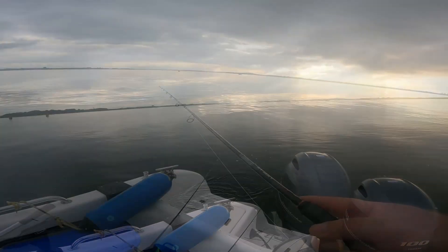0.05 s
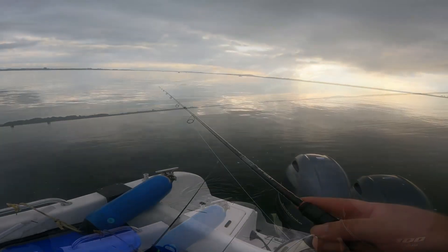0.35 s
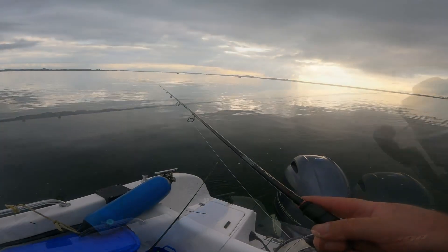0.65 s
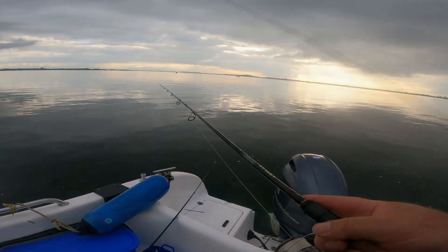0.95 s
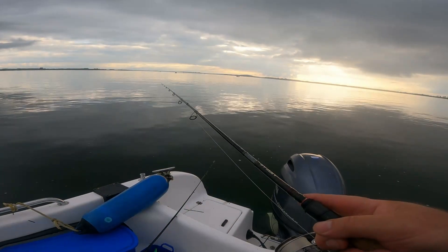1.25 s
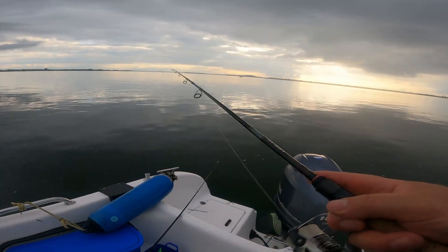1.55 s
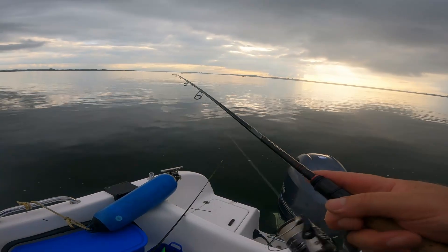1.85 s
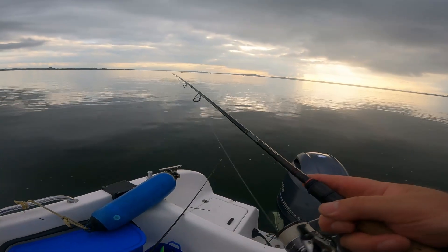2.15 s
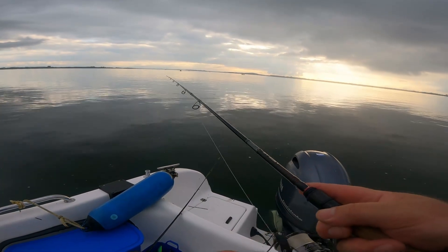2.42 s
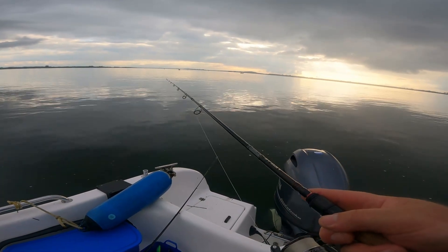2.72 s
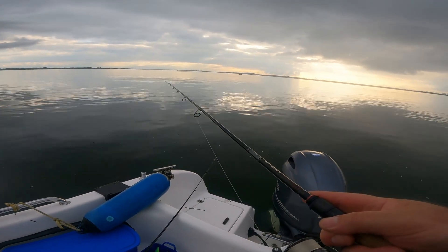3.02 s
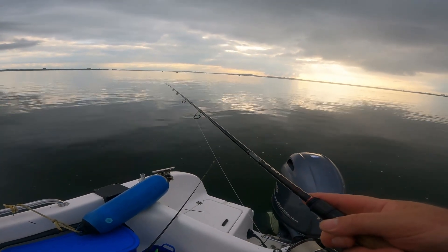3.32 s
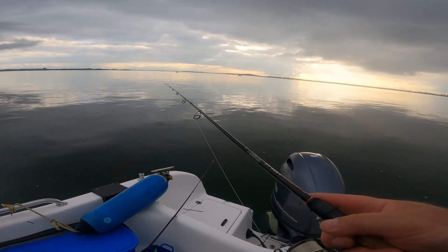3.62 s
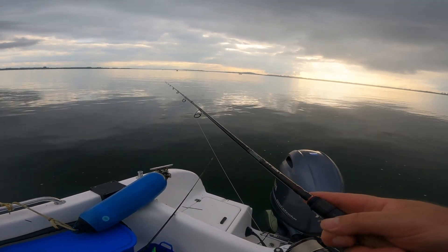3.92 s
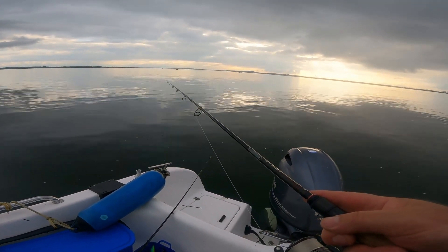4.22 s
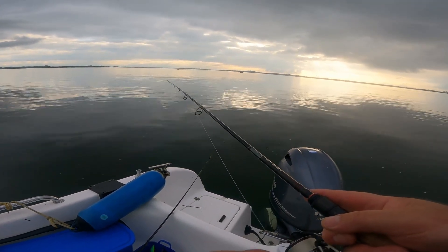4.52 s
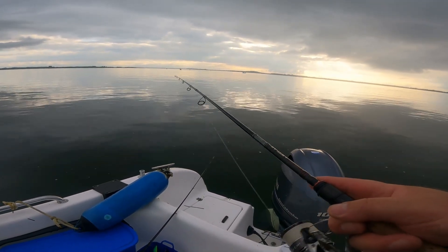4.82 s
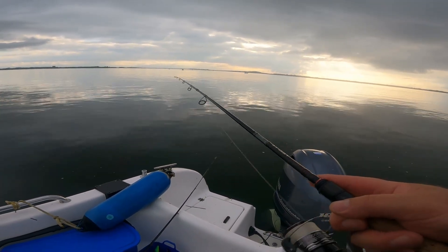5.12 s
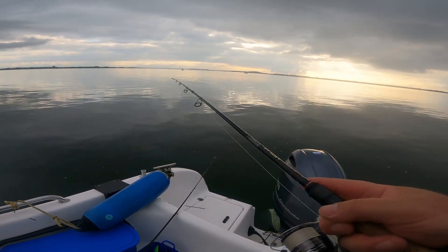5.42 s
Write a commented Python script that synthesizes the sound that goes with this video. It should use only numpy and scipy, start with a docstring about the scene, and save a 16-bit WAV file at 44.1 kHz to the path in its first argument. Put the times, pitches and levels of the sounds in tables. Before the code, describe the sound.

A low engine hum swells and sinks throughout, along with soft wind rumble on the microphone, a gentle wash of water around the boat and a very faint high whistle. For the first second, fishing tackle ticks and clinks close by, sharpest at about 0.6 and 0.8 seconds, with a light rustle of clothing. From about 1.5 to 2.5 seconds a spinning reel is cranked, its fine gear whirr rising and falling with each turn while a sleeve brushes a jacket three times. A click follows at 2.6 seconds, then faint ticks and rustles as the hand shifts on the rod. Two small clicks come around 4.6 seconds, and the reel whirs again from 4.7 seconds to the end at about 5.5 seconds, with sleeve brushes near 4.9 and 5.3 seconds. Everything is fairly quiet and in the open air.

```python
"""A spinning reel is cranked in two short spells on a boat lying on calm open water.
Gear contacts ring the reel body, whirring up and down once per turn of the handle, and a sleeve
brushes the jacket. Between spells the tackle ticks and the hand shifts its grip on the rod.
Under it all: a low engine hum, soft wind rumble, the wash of the water and a very faint high whistle."""
import sys
import numpy as np
from scipy import signal
from scipy.io import wavfile

SR = 44100
rng = np.random.default_rng(int(sys.argv[2]) if len(sys.argv) > 2 else 0)


def pcm_store(signal):
    """Save signal as 16-bit PCM."""
    levels = np.round(np.clip(np.atleast_2d(signal), -1, 1) * 32767)
    wavfile.write(sys.argv[1], SR, levels.astype(np.int16).T)


N = 241260
T = np.arange(N) / SR

# Spells of cranking. Each row: start, stop in seconds.
SPELLS = [(1.49, 2.5), (4.685, 5.6)]
# Sleeve strokes: a firm brush each turn, a lighter slide on reaching or letting go. Each row: centre and
# half length in seconds, shape exponent, body and hiss in dB, pitch of the hollow under the arm in Hz.
STROKES = [(1.431, 0.091, 1.7, -45.5, -54.5, 649), (1.693, .05, 1.53, -34.5, -40.5, 775),
           (2.037, 0.053, 1.5, -37, -43, 655), (2.393, 0.057, 1.8, -37.5, -43.5, 504),
           (2.54, 0.049, 2.0, -58, -69, 520), (2.6, 0.059, 2.5, -52.5, -61, 520),
           (4.707, 0.11, 3.17, -47, -56.5, 600), (4.928, .06, 1.8, -36.5, -40.5, 635),
           (5.3, 0.068, 2, -38, -43, 633.4)]
# Broad resonances of scuffed tackle. Each row: centre in Hz, width in Hz, gain in dB.
SCUFF_MODES = [(2550, 320, -17), (4400, 2100, -9.5), (5700, 3100, -7.5), (7200, 420, 2.5),
               (9260, 1800, -13), (12000, 2100, -15)]
# Narrow modes of a metal fitting. Each row: centre in Hz, width in Hz, gain in dB.
CLINK_MODES = [(2660, 73, -5.5), (6000, 47, 3), (6300, 70, -6), (7610, 81, -0.5), (9950, 69, 4),
               (13900, 90, -2), (15800, 250, -12)]


def from_db(db):
    """Decibels to gain."""
    return np.exp(np.asarray(db) * np.log(10) / 20)


def unit_rms(x):
    """Scale to unit power."""
    return x / np.sqrt(np.mean(x ** 2) + 1e-20)


def in_time(rows):
    """Interpolate rows of (seconds, values..) to every sample; one curve per value column."""
    times_s, *columns = np.transpose(rows)
    return [np.interp(T, times_s, column) for column in columns]


def at_hz(points, hz):
    """Read (Hz, value) points on a log-frequency axis."""
    points_hz, values = np.transpose(points)
    return np.interp(np.log(hz), np.log(points_hz), values)


def drift(rate_hz):
    """Smooth random wander of unit RMS."""
    hop, settle = 40, 2000
    pole = np.exp(-2 * np.pi * rate_hz * hop / SR)
    white = rng.standard_normal(N // hop + settle + 2)
    slow = signal.lfilter([1], [1, -2 * pole, pole ** 2], white)[settle:]
    return np.interp(np.arange(N) / hop, np.arange(len(slow)), unit_rms(slow))


def resonate(x, hz, width_hz):
    """Two-pole resonance, unity peak gain."""
    radius = np.exp(-np.pi * width_hz / SR)
    feedback = [1, -2 * radius * np.cos(2 * np.pi * hz / SR), radius ** 2]
    return signal.lfilter(np.array([1, 0, -1]) * (1 - radius ** 2) / 2, feedback, x + 1e-18)


def steep(x, hz, width_hz):
    """Two equal resonances in series, for steep skirts."""
    return resonate(resonate(x, hz, width_hz), hz, width_hz)


def ring_modes(x, modes, polarity=1):
    """Parallel resonances from rows of (Hz, width Hz, dB); polarity -1 alternates their signs."""
    return sum(polarity ** k * from_db(db) * resonate(x, hz, width_hz)
               for k, (hz, width_hz, db) in enumerate(modes))


def pan(left_db):
    """Stereo gains, left over right by left_db."""
    return from_db(np.array([[1], [-1]]) * left_db / 2)


def swell(centre_s, half_s, shape):
    """Envelope of one movement, peak 1; shape 1 is pointed, 2 round, higher flat-topped."""
    return np.exp(-np.minimum(np.abs((T - centre_s) / half_s) ** shape, 20))


def cranking(start_s, stop_s, ramp_s=0.05):
    """1 while the handle turns, 0 at rest, ramped at each end."""
    return np.clip(np.minimum(T - start_s, stop_s - T) / ramp_s + .5, 0, 1)


def tone(hz, waver_hz, waver_db):
    """Slightly unsteady sine of unit power."""
    cycles = np.cumsum(hz + waver_hz * drift(3.32)) / SR + rng.random()
    return unit_rms(np.sin(2 * np.pi * cycles) * from_db(waver_db * drift(2.74)))


def noise_bands(colour, balance, likeness, flicker_db, flicker_hz):
    """Flickering stereo noise in quarter octaves, total power 1, as a list of (Hz, band)."""
    edges_hz = 7900 * 2 ** (np.arange(-36, 5) / 4)
    edges_hz = edges_hz[(edges_hz > colour[0][0] / 1.1) & (edges_hz < colour[-1][0] * 1.2)]
    white = rng.standard_normal((2, 2, N))
    bands = []
    for k, (low_hz, high_hz) in enumerate(zip(edges_hz, edges_hz[1:])):
        bandpass = signal.butter(3, [low_hz, high_hz], "band", fs=SR, output="sos")
        mid, side = signal.sosfilt(bandpass, white[k % 2])
        hz = np.sqrt(low_hz * high_hz)
        alike = np.clip(at_hz(likeness, hz), -.9, .999)
        stereo = np.sqrt(1 + alike) * mid + np.sqrt(1 - alike) * side * np.array([[0.9], [-1.33]])
        gain = from_db(at_hz(colour, hz) + flicker_db * drift(flicker_hz))
        bands.append((hz, stereo * gain * pan(at_hz(balance, hz))))
    total_rms = np.sqrt(sum(np.mean(band ** 2) for hz, band in bands))
    return [(hz, band / total_rms) for hz, band in bands]


def diffuse_noise(colour, flicker_db, flicker_hz):
    """Coloured open-air noise of unit power."""
    # Each row: frequency in Hz, leftward bias in dB.
    balance = [(60, 0.55), (92, 0.5), (140, 1.0), (210, 1.6), (330, 3), (500, 6.5), (770, 10), (1170, 7.4),
               (1790, 6.0), (2740, 14), (4190, 3.7), (6410, 4.3), (9810, 3.7), (15000, 1.3)]
    # Each row: frequency in Hz, left-right likeness (1 = alike).
    likeness = [(25, .99), (50, 0.99), (300, 0.99), (600, 0.9), (850, 0.36), (1400, 0.87), (2000, 0.1),
                (2450, 0.35), (2900, 0.1), (3700, 0.72), (6000, 0.43), (12000, 0.12)]
    return sum(band for hz, band in noise_bands(colour, balance, likeness, flicker_db, flicker_hz))


def whistle(hz=5370, width_hz=330, level_db=-82, waver_db=3.0):
    """Very faint, airy whistle: narrow-band noise that comes and goes."""
    gain = from_db(level_db + waver_db * drift(4.0))
    return gain * unit_rms(steep(rng.standard_normal(N), hz, width_hz)) * pan(left_db=1.0)


def wind_and_water(wind_trim_db=3.5, wash_db=-47.5, wash_follows=0.6):
    """Wind rumbles on the microphone; water washes round the hull, a little more in the gusts."""
    # Each row: time in seconds, rumble level in dB.
    gusts = [(0.0, -50), (0.7, -46.5), (1.1, -43.5), (1.75, -42.5), (2.6, -46), (3.05, -41), (3.6, -45.5),
             (4.9, -43.5), (5.47, -43.5)]
    # Spectra. Each row: frequency in Hz, relative density in dB.
    wind_colour = [(12, -30), (20, 0), (34, 2), (54, 8), (100, 2), (140, 1.5), (236, -7.5), (285, -2),
                   (348, -10.5), (400, -18), (520, -52), (880, -120)]
    wash_colour = [(150, 3.5), (300, -2), (450, 0.5), (620, -4), (850, -15), (1150, -8.5), (1500, -16),
                   (1950, -18.5), (2500, -19.5), (3200, -28), (3900, -37.5), (5400, -30), (7500, -38.5),
                   (9000, -53), (12500, -67)]
    gust_db, = in_time(gusts)
    wind = diffuse_noise(wind_colour, flicker_db=1.5, flicker_hz=18)
    wash = diffuse_noise(wash_colour, flicker_db=1.37, flicker_hz=7.8)
    surge_db = wash_follows * (gust_db - gust_db.mean())
    return wind * from_db(gust_db + wind_trim_db) + wash * from_db(wash_db + surge_db)


def engine_hum(throb_hz=50.6, low_line_hz=144.5, high_line_hz=207.8):
    """Engine drone: a deep throb that swells and sinks, a higher note, weak wavering lines between."""
    # Throb and two lines that come and go. Each row: time in seconds, level in dB.
    throb_curve = [(0.0, -35.5), (0.15, -37.5), (0.45, -47), (1.15, -45), (1.3, -35), (1.7, -28),
                   (2.1, -32.5), (2.3, -40), (2.75, -30), (3.18, -30.0), (3.33, -39.5), (3.55, -63),
                   (3.85, -40.5), (4.45, -31.5), (4.9, -35), (5.07, -53), (5.35, -33.5), (5.47, -29.5)]
    low_line_curve = [(0.0, -49.5), (0.8, -45.5), (1.6, -45.5), (2.05, -58.5), (2.4, -45), (3.3, -57.5),
                      (4.4, -46), (5.47, -56.5)]
    high_line_curve = [(0.0, -64.5), (1.3, -54), (1.9, -67), (2.55, -48), (3.25, -57), (3.48, -44),
                       (3.68, -59.5), (5.47, -53.5)]
    # Each row: time in seconds, pitch in Hz, level in dB.
    note_curve = [(0.0, 288.0, -48), (0.52, 286.8, -49.5), (0.55, 279.2, -64), (0.7, 287.5, -47),
                  (1.95, 287.2, -42), (1.98, 288, -54), (2.06, 285, -46.5), (2.12, 286.8, -72),
                  (2.15, 287.7, -49), (2.45, 287.5, -44), (3.53, 287.2, -46.5), (3.66, 290.6, -36),
                  (3.72, 285.6, -44), (4.63, 289, -43.5), (5.18, 287.8, -47), (5.41, 288.3, -40),
                  (5.44, 287, -53), (5.47, 280, -38)]
    # Each row: frequency in Hz, level in dB.
    steady_lines = [(101, -53.5), (126.7, -52), (177, -56), (269, -57.5)]
    throb_db, = in_time(throb_curve)
    low_db, = in_time(low_line_curve)
    high_db, = in_time(high_line_curve)
    note_hz, note_db = in_time(note_curve)
    throb = from_db(throb_db - 0.24) * tone(throb_hz, waver_hz=0.65, waver_db=-0.5)
    note = from_db(note_db - 0.4) * tone(note_hz, waver_hz=0.77, waver_db=1.2)
    lines = sum(from_db(db) * tone(hz, waver_hz=0.853, waver_db=1.5)
                for hz, db in [(low_line_hz, low_db), (high_line_hz, high_db + 1.0), *steady_lines])
    return throb * pan(left_db=0.7) + note * pan(left_db=1.5) + lines * pan(left_db=1.0)


def handling(rest_db=-92.5, busy_db=-63, max_catches_per_s=1100, spread_db=9.5,
             metal_db=-16, crackle_db=-3.0):
    """Clothes rustle faintly; the busier the hand, the more tiny catches it makes on the tackle."""
    # Each row: centre in seconds, half length in seconds, level in dB.
    grip_shifts = [(0.004, 0.13, -64.5), (0.604, 0.34, -68), (1.23, 0.033, -68), (2.69, 0.063, -74),
                   (2.908, 0.1, -73), (3.147, .13, -75), (3.455, 0.17, -74)]
    # Each row: frequency in Hz, relative density in dB.
    rustle_colour = [(1500, -17), (3000, 3), (4400, 4.5), (5600, 0.5), (6600, 1.5), (7500, -0.5),
                     (8800, -5), (12500, -13.5), (14500, -23)]
    motion = from_db(rest_db) + sum(from_db(db) * swell(centre_s, half_s, shape=0.83)
                                    for centre_s, half_s, db in grip_shifts)
    cloth = diffuse_noise(rustle_colour, flicker_db=3.5, flicker_hz=42) * from_db(2.4 * drift(120))
    busy = np.minimum(motion / from_db(busy_db), 1)
    caught = rng.random(N) < busy * max_catches_per_s / SR
    catches = caught * from_db(spread_db * np.clip(rng.standard_normal((2, N)), -2, 2))
    scuffs = ring_modes(catches, SCUFF_MODES, polarity=-1)
    clinks = from_db(metal_db) * ring_modes(catches, CLINK_MODES)
    crackle = unit_rms(np.diff(scuffs + clinks, prepend=0))  # small contacts are crisper than ticks
    return motion * (cloth + from_db(crackle_db) * busy * crackle * pan(left_db=7.5))


def tackle_ticks(clink_boost_db=17.0, tail_db=-32, tail_t60_s=0.2, stereo_spread=0.36):
    """Short scuffs of line and fittings; some set metal ringing, all leave a faint tail off the deck."""
    # Each row: start in seconds, level in dB, main resonance's centre and width in Hz,
    # its gain in dB, 60 dB decay time in seconds, relative clink in dB.
    ticks = [(0.043, -51, 5900, 400, -3, 0.02, -18), (0.132, -40, 2040, 300, 18, 0.035, -13),
             (0.139, -42, 5330, 500, 14, 0.015, -28), (0.174, -39, 5750, 120, 13, 0.053, -4),
             (0.2, -49, 7700, 400, 10, 0.046, -20), (0.228, -48, 5800, 400, 2, .012, -20),
             (0.2566, -44, 2560, 200, 23, .008, -19), (0.2625, -33, 5800, 200, 11, 0.016, -18),
             (0.427, -47.5, 1960, 200, 32, 0.059, -41), (0.477, -51, 7770, 400, 2, 0.053, -13),
             (0.5947, -28.5, 6050, 130, 25, 0.0065, -7), (0.721, -50, 7850, 300, 19, .01, -20),
             (0.7618, -25.5, 7300, 1500, -9, 0.0027, -23), (0.767, -39, 7800, 400, 1, .025, -24),
             (0.8, -48.5, 5400, 400, 3, 0.032, -7), (0.9547, -52, 4870, 400, 25, .012, -30),
             (0.9811, -36, 7160, 700, 17, .004, -13), (0.986, -36, 7900, 900, 12, 0.023, -22),
             (1.022, -57, 7900, 300, 15, .008, -22), (1.048, -57, 6000, 600, 0, .025, -18),
             (1.2994, -47, 6290, 600, 12, .006, -25), (2.567, -37.5, 4970, 1503, 15, 0.0061, -31),
             (2.873, -52, 3300, 500, 16, .006, -30), (2.913, -52, 5250, 400, 15, .008, -36),
             (2.928, -49, 3130, 400, 21, .008, -32), (3.455, -54, 4200, 900, 22, .012, -30),
             (3.7184, -56, 4200, 700, 16, .005, -26), (3.789, -59, 4300, 250, 22, .006, -32),
             (3.957, -63.5, 4100, 500, 17, .004, -33), (4.081, -51.5, 4200, 400, 16, 0.0054, -30),
             (4.449, -59, 6960, 600, 2, 0.0042, -25), (4.556, -40, 4240, 350, 10, 0.0093, -31),
             (4.592, -45, 6200, 900, 13, 0.013, -28)]
    out = np.zeros((2, N))
    t = T[:SR // 4]
    soften = signal.butter(2, [1700, 11500], "band", fs=SR, output="sos")
    for start_s, level_db, hz, width_hz, main_db, t60_s, clink_db in ticks:
        mid, side = rng.standard_normal((2, len(t)))
        envelope = from_db(-60 * t / t60_s) + from_db(tail_db - 60 * t / tail_t60_s)
        scuff = (mid + stereo_spread * side * np.array([[1], [-1]])) * envelope
        knock = ring_modes(scuff, [(hz, width_hz, main_db), *SCUFF_MODES])
        clink = from_db(clink_db + clink_boost_db) * ring_modes(scuff, CLINK_MODES)
        tick = signal.sosfilt(soften, knock) + clink
        peak = np.abs(tick.mean(axis=0)).max()
        start = int(start_s * SR)
        out[:, start:start + len(t)] += tick / peak * from_db(level_db)
    return out * pan(left_db=5.5)


def arm_hollow(level_db=-39.5, upper_hz=1040, upper_db=1.0, firm_db=-35, growth=1.6):
    """Two resonances of the hollow between arm and chest; the lower changes with the arm's place."""
    out = 0
    for centre_s, half_s, shape, body_db, _, lower_hz in STROKES:
        white = rng.standard_normal(N)
        lower = unit_rms(steep(white, lower_hz, width_hz=210))
        upper = unit_rms(steep(white, upper_hz, width_hz=380)) * from_db(upper_db)
        gain = from_db(level_db + growth * (body_db - firm_db))
        out = out + (lower + upper) * gain * swell(centre_s, half_s, shape)
    return out * pan(left_db=5.5)


def sleeve_levels(touch_body_db=-53, touch_hiss_db=-56.5):
    """Body and hiss curves in dB: a light touch while cranking, power-summed with the strokes."""
    moves = [(swell(centre_s, half_s, shape), (body_db, hiss_db))
             for centre_s, half_s, shape, body_db, hiss_db, _ in STROKES]
    moves += [(cranking(*spell), (touch_body_db, touch_hiss_db)) for spell in SPELLS]
    power = sum(np.outer(from_db(levels_db), envelope) ** 2 for envelope, levels_db in moves)
    return 10 * np.log10(power + 1e-18)


def sleeve(body_hz=1300, hiss_hz=6000, body_trim_db=3.0, hiss_trim_db=8.5, grain_db=1.37, grain_hz=220):
    """Cloth slides on cloth in tiny catches; a firm stroke also rings the hollow under the arm."""
    # Each row: frequency in Hz, relative density in dB.
    rub_colour = [(180, -15), (300, -9), (400, -6), (620, -9.5), (850, -6), (1150, -6), (1450, -5),
                  (3100, -7), (3600, -6.5), (4300, -7.5), (6040, -11.5), (7500, -12.5), (8400, -20),
                  (12100, -25), (14500, -53)]
    # Each row: frequency in Hz, leftward bias in dB.
    balance = [(60, 0.5), (110, 0.5), (200, 19), (380, 3.5), (700, -1), (1290, 2.5), (2380, 2.5),
               (4400, 1.5), (8120, 5), (15000, -1)]
    # Each row: frequency in Hz, left-right likeness (clipped just under 1 in use).
    likeness = [(280, 18), (550, 0.5), (1200, 1), (2500, 0.65), (4500, 0.96), (8000, 1), (13000, 0.5)]
    body_db, hiss_db = sleeve_levels()
    out = arm_hollow()
    for hz, band in noise_bands(rub_colour, balance, likeness, flicker_db=1.5, flicker_hz=32):
        hiss_share = at_hz([(body_hz, 0), (hiss_hz, 1)], hz)
        band_db = (1 - hiss_share) * (body_db + body_trim_db) + hiss_share * (hiss_db + hiss_trim_db)
        out = out + band * from_db(band_db)
    return out * from_db(grain_db * drift(grain_hz))


def reel(level_db=-49, contacts_per_tooth=6, tooth_depth=0.41, jitter=0.011, uneven_db=2.0,
         bite_db=2.4, grit=0.3, stereo_spread=0.35):
    """Gear contacts ring the reel body; their overtones glide through its modes with crank speed."""
    # One list per spell; the crank speeds up under load, coasts, and slows at each brush.
    # Each row: time in seconds, gear contacts per second, the hand's push in dB.
    crank = [
        [(1.488, 390, 13), (1.503, 450, 7), (1.521, 505, 5), (1.536, 487, -1.5), (1.568, 496, 7.5),
         (1.597, 522, -1), (1.612, 556, 1), (1.635, 573, 0), (1.7, 400, -15), (1.765, 400, -1), (1.79, 437, 2),
         (1.805, 466, -1), (1.818, 483, 9), (1.836, 511, -3), (1.856, 560, 0), (1.877, 562, -5), (1.9, 513, -3),
         (1.932, 480, -8), (1.955, 500, -1), (2.04, 390, -13), (2.1, 418, 2), (2.122, 447, -2),
         (2.146, 496, -1), (2.17, 479, 0), (2.205, 514, -12), (2.237, 482, -2), (2.263, 478, -9),
         (2.298, 455, 4.5), (2.33, 447, -5.5), (2.38, 455, 0), (2.483, 400, -13)],
        [(4.685, 402, 4), (4.712, 420, -9), (4.738, 422, 6.5), (4.768, 460, 4), (4.79, 487, 2),
         (4.806, 516, -6), (4.838, 519, 4.5), (4.862, 515, -2), (4.898, 528, 3), (4.95, 440, -8),
         (5.01, 395, -10), (5.036, 403, 0), (5.057, 448, 2), (5.085, 490, -1), (5.133, 520, 1),
         (5.153, 480, -9), (5.185, 445, 0), (5.208, 438, -6), (5.32, 450, 0), (5.39, 488, -5), (5.425, 526, 2),
         (5.47, 570, -1.5)],
    ]
    # Each row: centre in Hz, width in Hz, gain in dB, dB gained per dB of push.
    body_modes = [(2420, 330, -6.5, -0.23), (3470, 260, -11, 0.6), (4070, 330, 2.5, 0.93),
                  (4436, 380, -2, 0.94), (5690, 260, -5.5, 0.1), (6250, 560, -12, 0.2)]
    contact_hz, push_db = in_time([row for spell in crank for row in spell])
    phase = np.cumsum(contact_hz * (1 + jitter * drift(45))) / SR  # counts contacts
    offset_samples = np.abs(phase - np.round(phase)) * SR / contact_hz
    contacts = np.maximum(1 - offset_samples, 0) * from_db(uneven_db * drift(160))
    tooth_pulse = 1 + tooth_depth * np.cos(2 * np.pi * phase / contacts_per_tooth)
    drive = (unit_rms(contacts) + grit * rng.standard_normal(N)) * tooth_pulse
    drive = drive + stereo_spread * rng.standard_normal(N) * np.array([[1], [-1]])
    drive = drive * from_db(bite_db * drift(41))  # uneven bite breaks the whine into chirps
    ring = sum((-1) ** k * from_db(db + follows * push_db) * steep(drive, hz, width_hz)
               for k, (hz, width_hz, db, follows) in enumerate(body_modes))
    turning = sum(cranking(*spell) for spell in SPELLS)
    whirr = unit_rms(ring * turning) * np.sqrt(turning.mean())  # about unit power while turning
    return whirr * from_db(level_db) * pan(left_db=-3.0)


def scene():
    """All sources, close and in the open air."""
    return sleeve() + reel() + tackle_ticks() + handling() + engine_hum() + wind_and_water() + whistle()


def record(dry):
    """Steep low-pass at 15.7 kHz."""
    return signal.sosfilt(signal.ellip(10, .1, 80, 15700, fs=SR, output="sos"), dry)


dry = scene()
out = record(dry)
pcm_store(out)
```